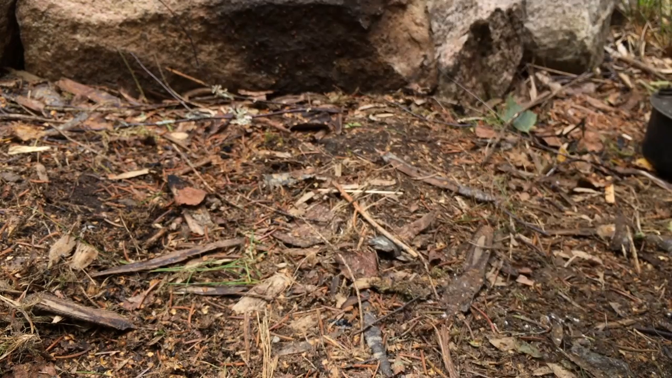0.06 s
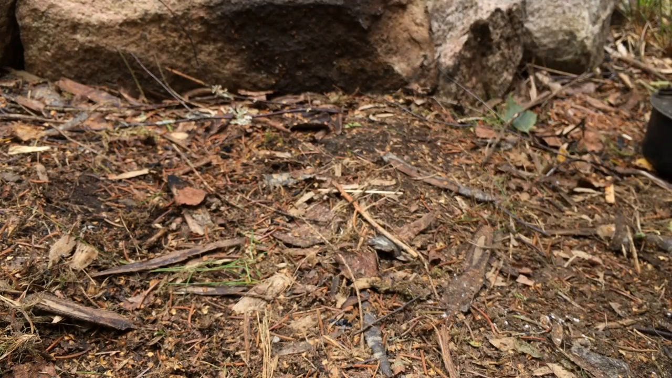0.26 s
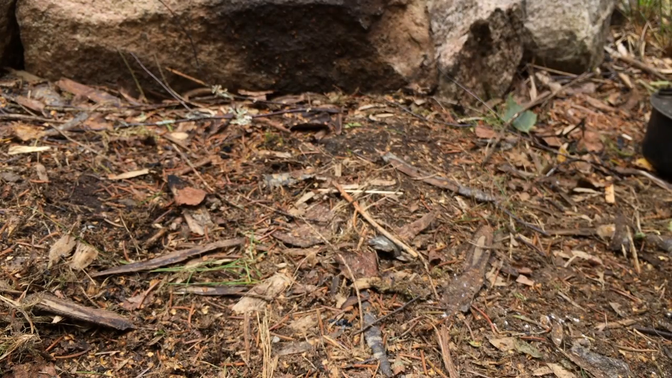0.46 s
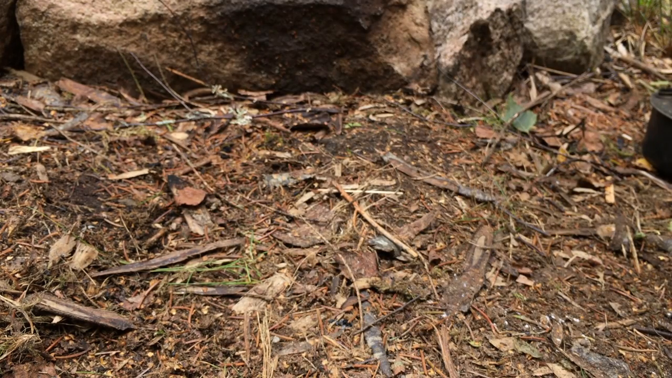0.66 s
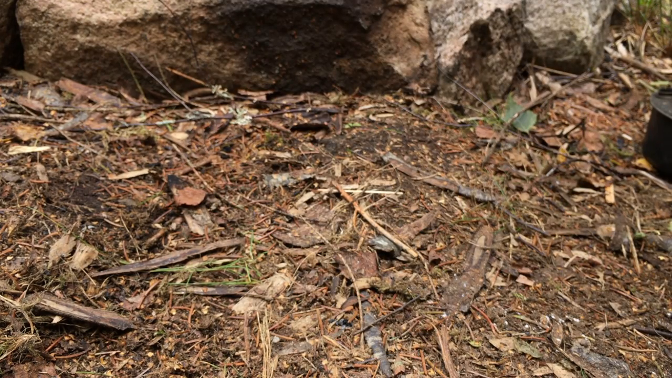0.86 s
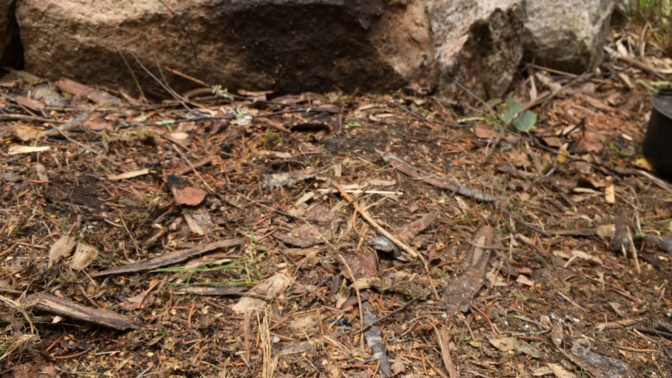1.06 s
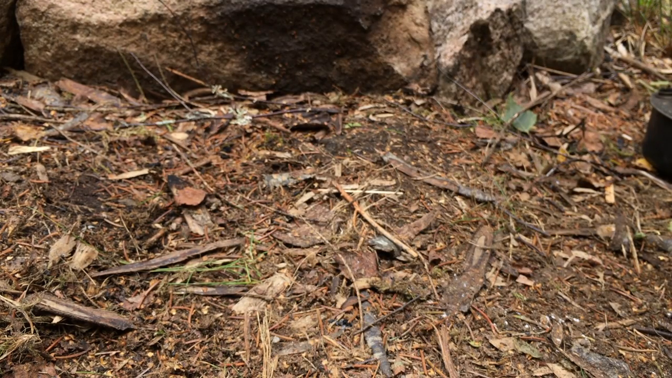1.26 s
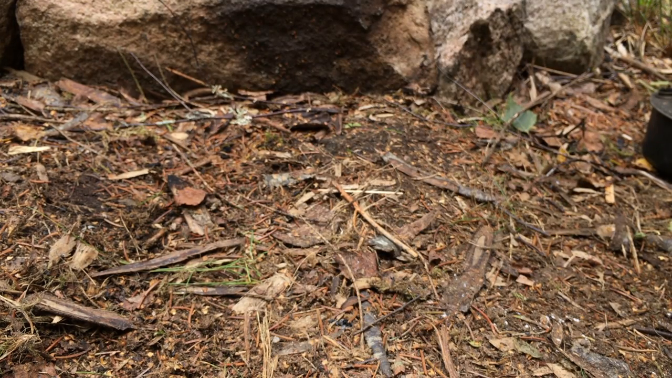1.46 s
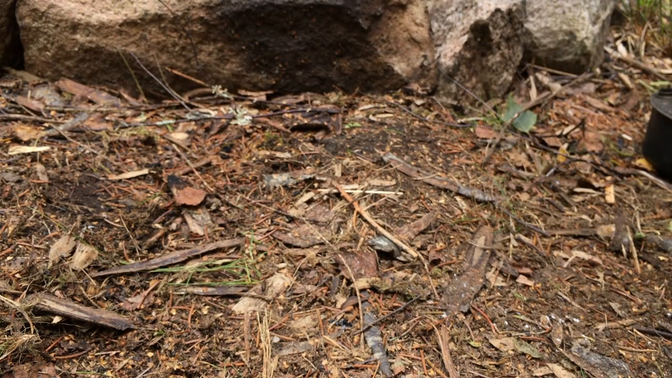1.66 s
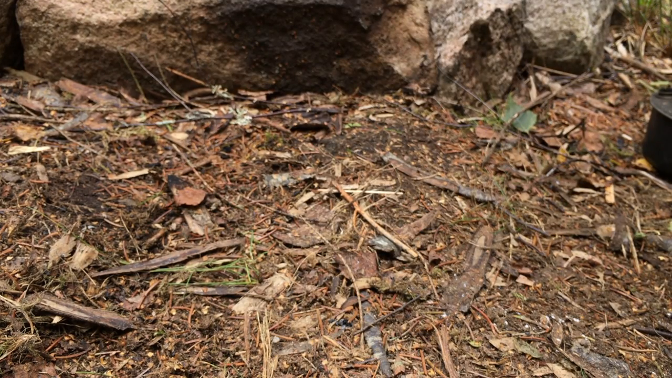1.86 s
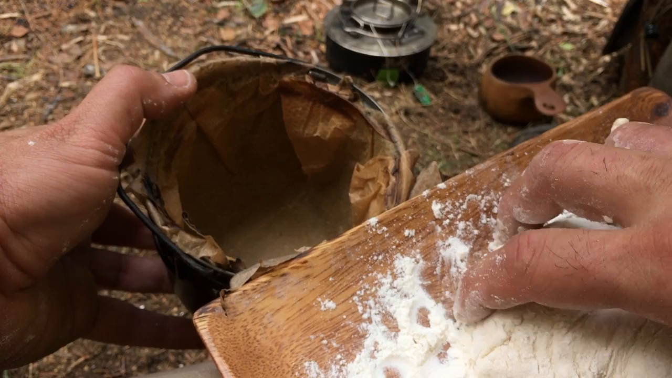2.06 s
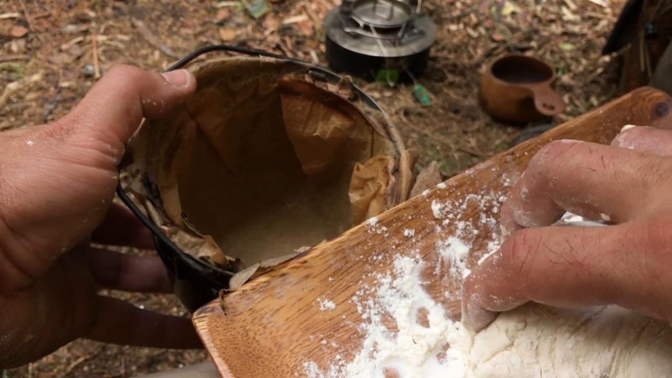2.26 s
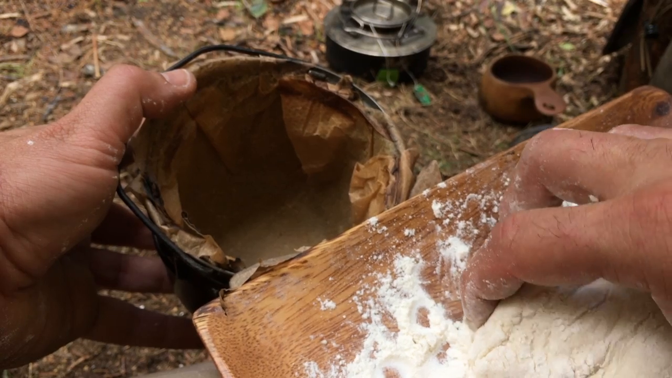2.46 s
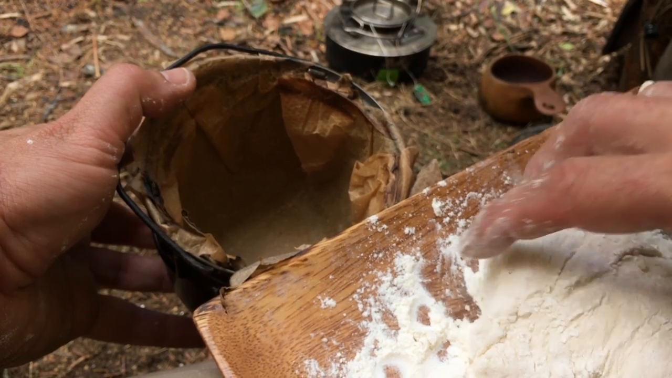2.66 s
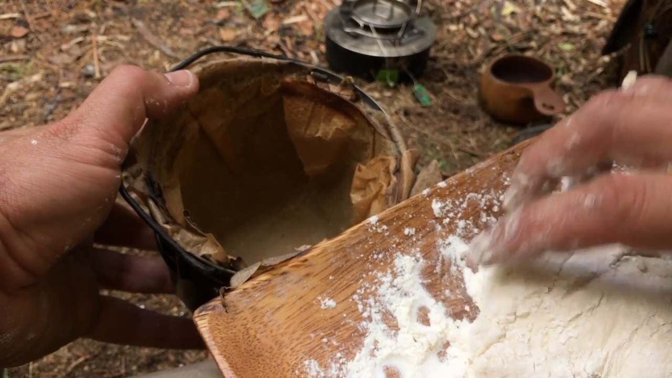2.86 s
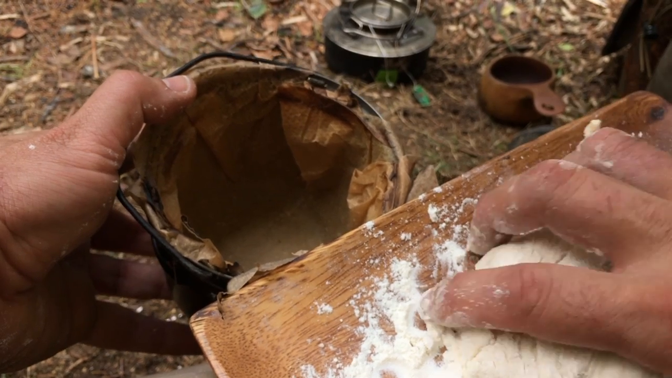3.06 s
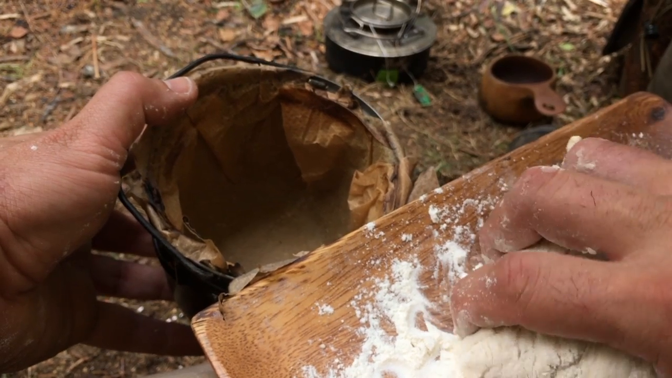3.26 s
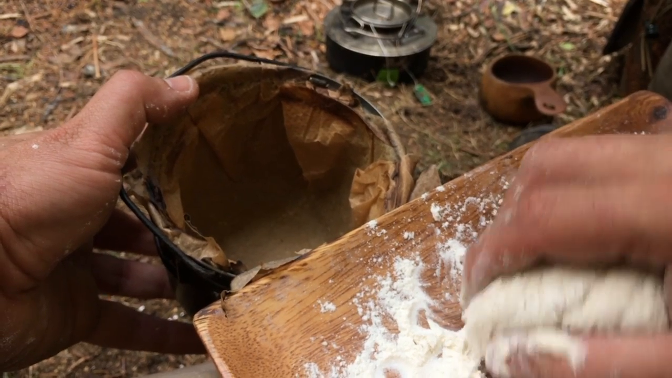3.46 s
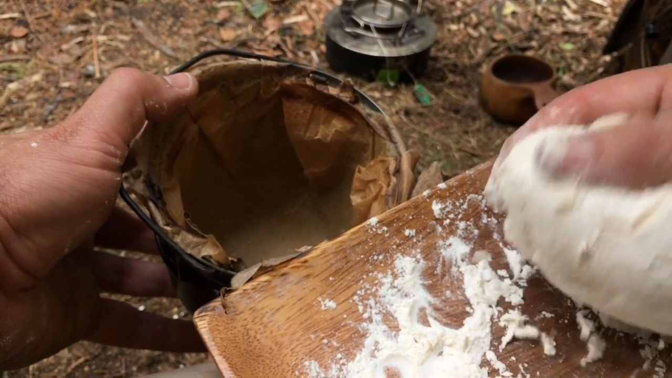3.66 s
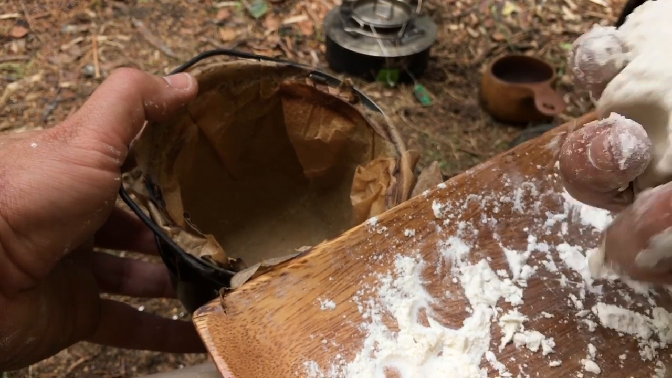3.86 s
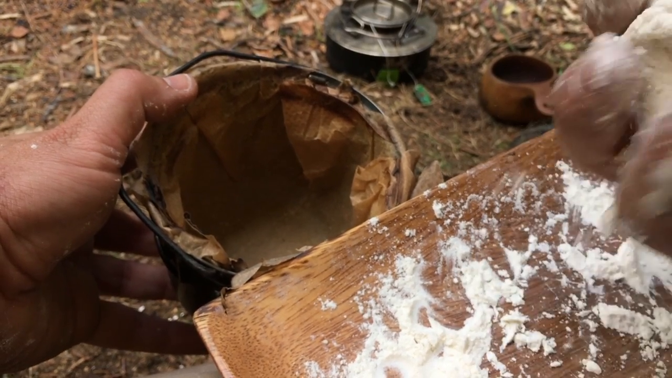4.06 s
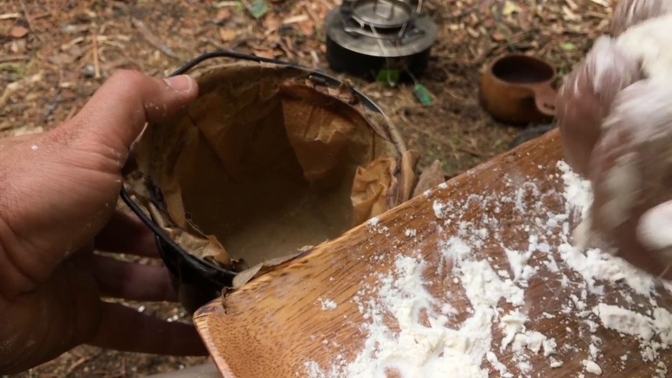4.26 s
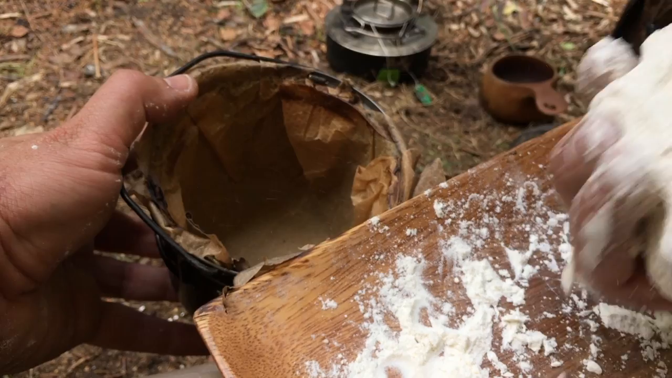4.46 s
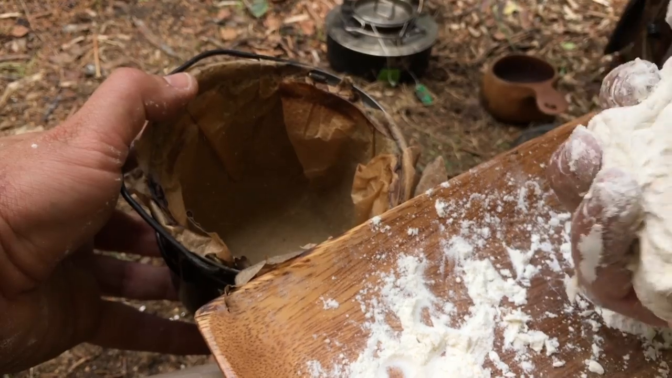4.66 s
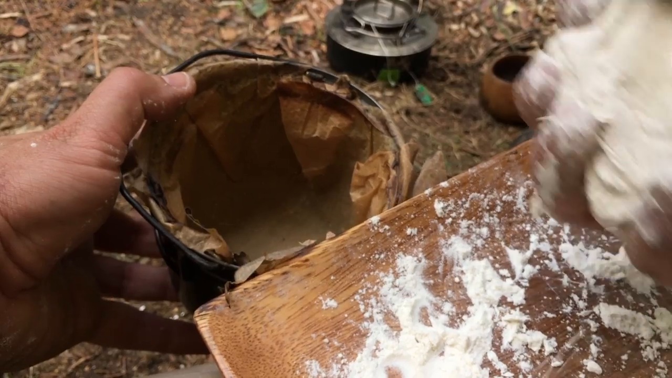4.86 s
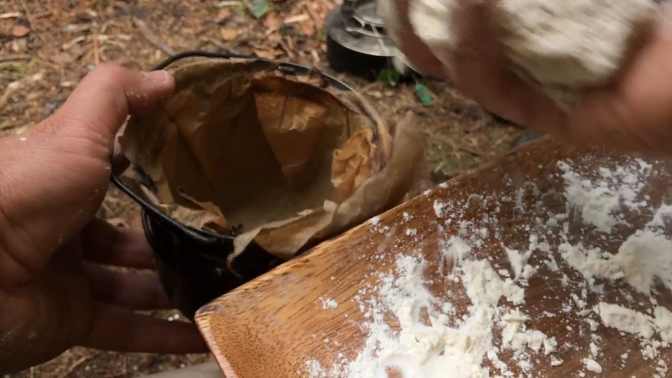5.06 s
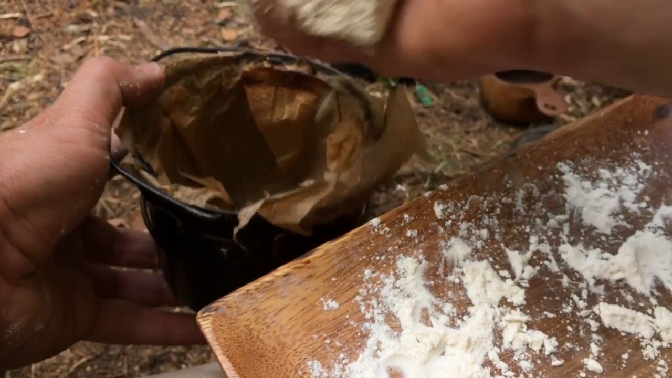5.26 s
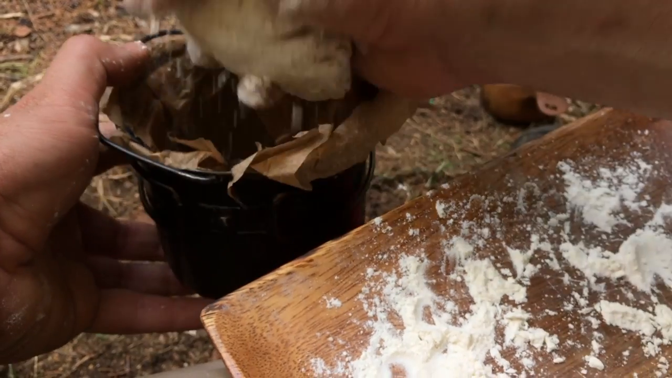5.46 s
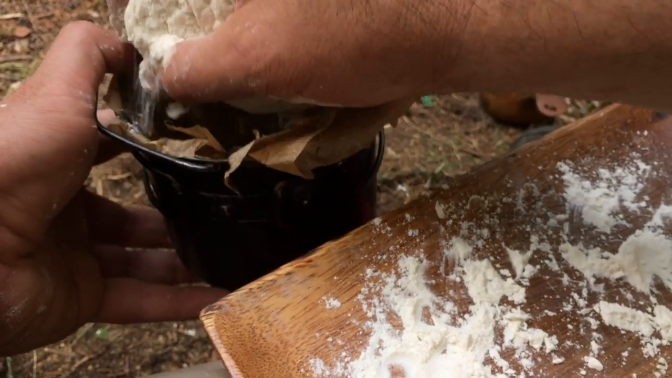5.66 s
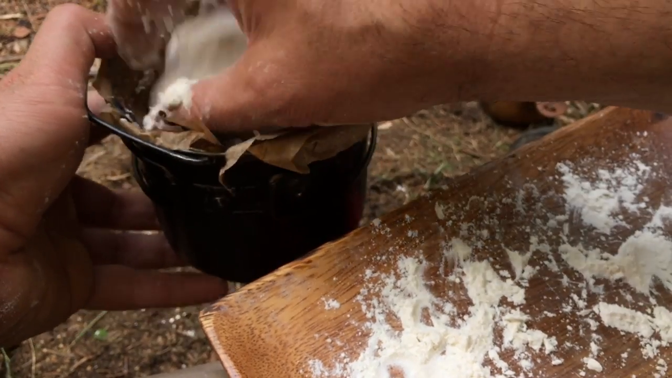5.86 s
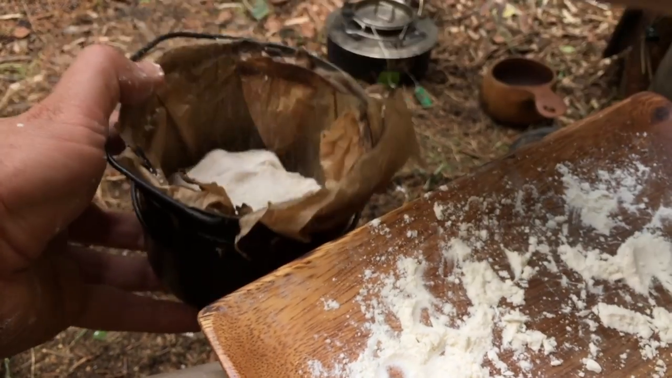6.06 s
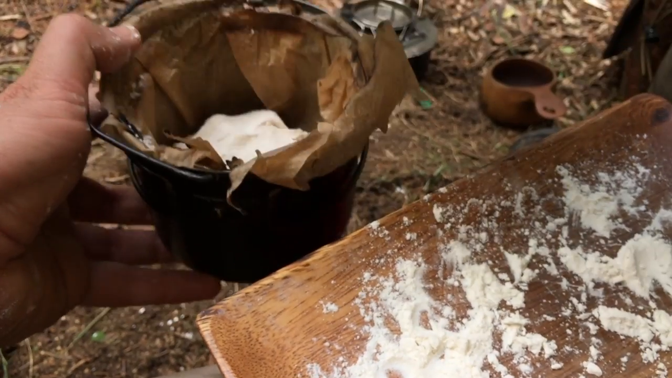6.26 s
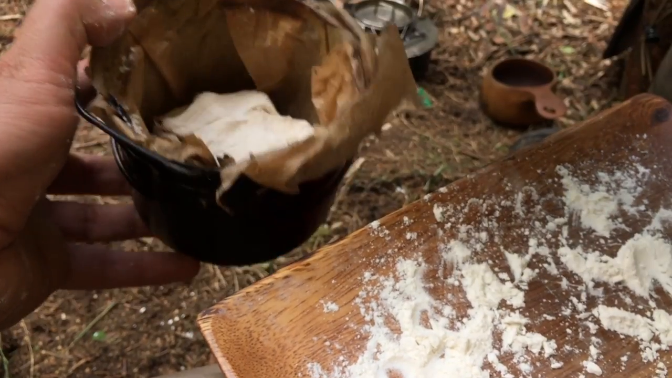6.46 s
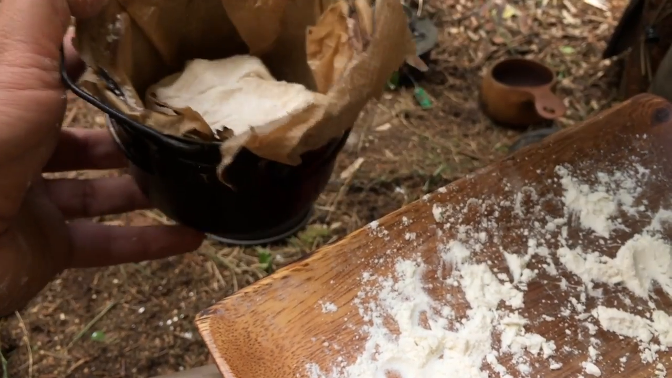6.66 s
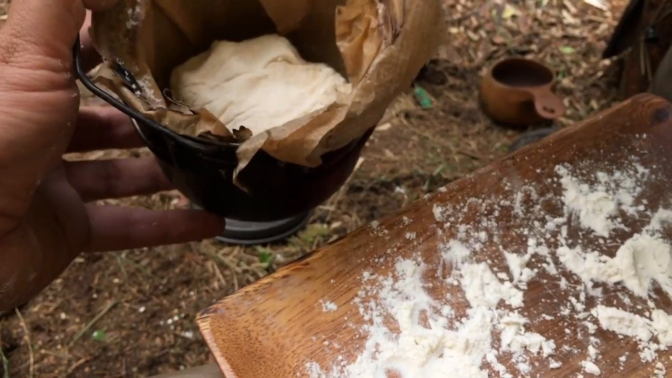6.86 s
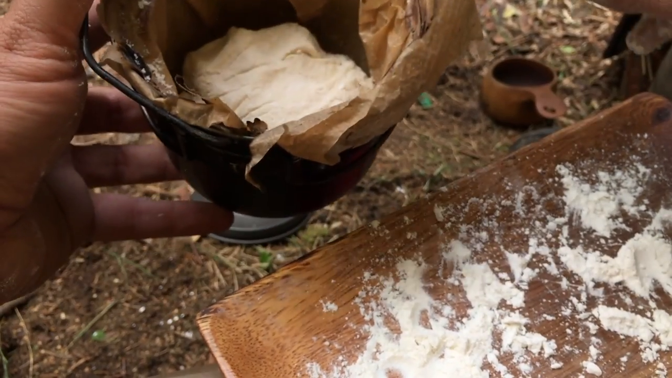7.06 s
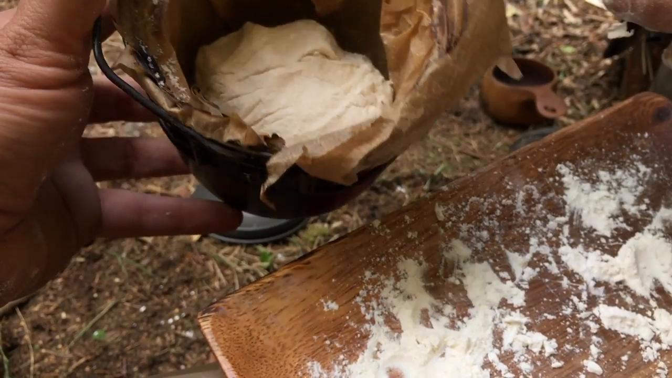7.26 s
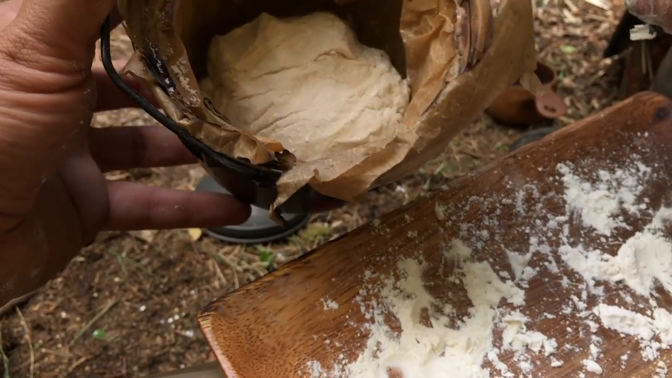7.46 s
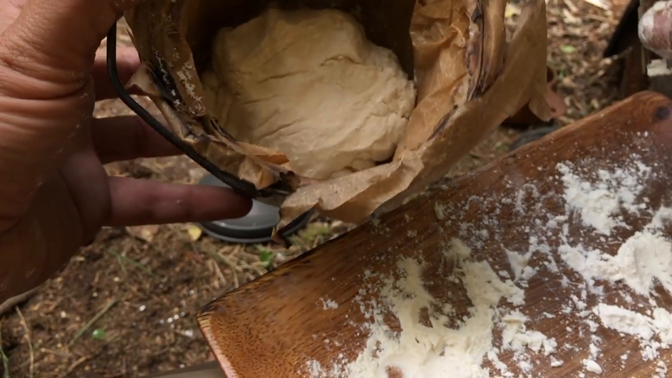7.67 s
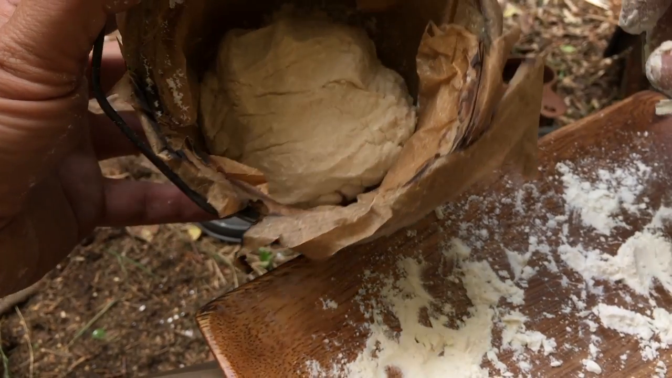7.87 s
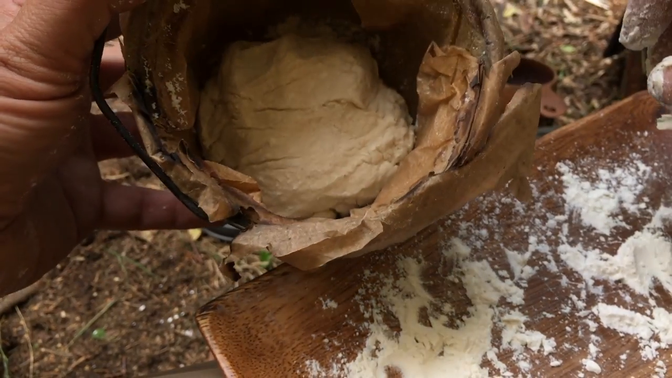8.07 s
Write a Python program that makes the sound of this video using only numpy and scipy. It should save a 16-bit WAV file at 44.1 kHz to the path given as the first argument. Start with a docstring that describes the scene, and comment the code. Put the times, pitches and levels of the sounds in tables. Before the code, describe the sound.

Hands move a small metal pot lined with baking paper, which rustles and snaps softly. The wire handle clinks against the pot early on, followed by quieter strokes of sliding paper. Then a ball of dough drops in with a loud crunch, a thud and a hollow knock. Scattered crackles and a faint rub of the pot follow. One microphone picks it up outdoors, over light wind rumble and faint hiss.

```python
"""Outdoors, over light wind rumble and a faint hiss, hands move a small metal pot lined with baking paper.
From the start the paper rustles by stick-slip friction, coloured by the pot's cavity, and creases snap.
Just after 1 s the wire handle clinks on the pot wall; more strokes of sliding paper follow. Near 6 s
a ball of dough drops in, crushing the paper with a thud and a hollow knock. Scattered snaps go on, and
near 7.7 s the pot is rubbed and hums briefly. One microphone feeds both channels."""
import sys
import numpy as np
from scipy import signal
from scipy.fft import rfft, irfft, next_fast_len
from scipy.io import wavfile
from scipy.ndimage import uniform_filter1d

SR = 44100
rng = np.random.default_rng(int(sys.argv[2]) if len(sys.argv) > 2 else 0)


def generate_wav(signal):
    """Clip the signal to [-1, 1] and save it as 16-bit WAV at the path in sys.argv[1]."""
    frames = np.transpose(np.atleast_2d(signal))
    scaled = np.clip(frames, -1, 1) * 32767
    pcm = np.round(scaled).astype(np.int16)
    wavfile.write(sys.argv[1], SR, pcm)


N = 357210

# paper sliding on dough, hand or pot:
# start t/s, rise t/s, hold t/s, fall t/s, level/dB, brightness/dB, cavity/dB, flap f/Hz, flap/dB
STROKES = [(0.397, .007, .002, 0.048, -39, -2.5, -10, 5400, -26),
           (0.434, .006, 0.048, 0.069, -42, -6, -11, 5400, -13),
           (1.147, .003, .002, 0.096, -46, -1, -23, 5000, -20),
           (1.103, 0.23, .004, 0.045, -36.5, 0, -16.5, 4950, -19),
           (1.95, 0.064, 0.085, 0.05, -45, 0, -36, 8400, -29),
           (2.171, 0.018, 0.27, 0.14, -51.5, -3, -10, 6800, -25),
           (2.539, 0.012, .002, 0.097, -43.5, -4, -12.5, 3340, -25),
           (2.883, 0.037, .03, 0.035, -44.5, -22, -11, 1330, -13),
           (2.997, 0.099, .002, .014, -51, -21, -1, 1480, -4),
           (3.122, 0.054, 0.073, 0.12, -40, -1.5, -18, 2680, -17),
           (3.463, 0.0054, .002, 0.19, -50.5, -5, -6.5, 4440, -8),
           (3.564, 0.065, .002, .022, -49, -0.5, -18, 4350, -8),
           (3.873, 0.036, .002, 0.023, -44, -0.5, -33, 4970, -16),
           (4.295, 0.021, 0.059, .011, -51, -1.5, -24, 4500, -16),
           (4.495, .008, 0.049, .012, -51.5, -1.5, -20, 6400, -7),
           (4.871, .02, 0.12, .02, -49, -2, -10.5, 5600, -15),
           (4.921, 0.12, 0.056, .016, -35.5, -1, -8.5, 2140, -8),
           (5.446, 0.026, 0.0568, 0.032, -32.5, -0.5, -18, 8850, -17),
           (5.542, 0.011, .035, 0.043, -42, -1, -15.5, 5040, -13),
           (5.634, 0.031, .002, 0.058, -40.5, -8, -6, 3700, -10),
           (5.754, 0.013, 0.082, .004, -44.5, 3, -29, 4500, -16),
           (5.84, 0.114, 0.0027, 0.0069, -19.5, -0.5, -18, 4350, -13.5),
           (5.974, .002, .002, 0.024, -20.5, 2, -15.5, 4200, -21),
           (6.788, 0.0037, 0.033, 0.0083, -44, -1.5, -17.5, 6600, -15),
           (7.175, 0.0042, .024, 0.011, -42.5, -2, -21, 5400, -13),
           (7.317, 0.0065, 0.025, .003, -43, -3, -16, 4000, -13),
           (7.442, 0.0047, 0.018, 0.0045, -46, -5, -13, 5100, -7),
           (7.543, 0.0053, .002, 0.037, -48, -5, -24, 4000, -11),
           (7.627, .009, .002, .012, -40, -1.5, -13, 4400, -11),
           (7.721, 0.0016, .002, 0.045, -41, -3.5, -14, 2020, -12),
           (7.84, 0.0018, .002, 0.036, -40, 5, -26, 2020, -17)]
def strokes():
    """Sliding friction drives the sheet and the cavity; a free flap of paper adds one broad resonance."""
    out, parts = np.zeros(N), np.array(sheet_sound())
    for start, *shape, bright_db, cavity_db, flap_hz, flap_db in STROKES:
        level = slide_envelope(start, *shape)
        fine, coarse, hollow, friction = parts[:, round(start * SR):][:, :len(level)]
        flap = gain_of(flap_db) * unit_rms(band(friction, flap_hz / 1.14, flap_hz * 1.14))
        add(out, start, level * (blend(fine, coarse, hollow, bright_db, cavity_db) + flap))
    return out

# restless handling of the paper: t/s, level/dB
HANDLING = [(0, -48.5), (.28, -50), (.55, -43), (.8, -47), (1.44, -48), (1.95, -51), (2.6, -63),
            (3.05, -52), (3.81, -56), (4.6, -58.5), (5.4, -58.5), (5.62, -55.5), (5.98, -46), (6.38, -54),
            (6.47, -59.5), (8.1, -59)]
def rustle():
    """Friction in the ever-shifting paper makes a quiet rustle; small creases buckle in stray ticks."""
    level_db = contour(HANDLING)
    cavity_db = -6.5 - 0.18 * (level_db + 55.5)  # the cavity follows the rustle's level only in part
    fine, coarse, hollow, _ = sheet_sound()
    paper = blend(fine, coarse, hollow, bright_db=-3.5, cavity_db=cavity_db)
    ticks = gain_of(-1) * random_bursts(per_s=22, spread_db=1.5, decay_s=0.00058, samples=400)
    return gain_of(level_db) * (paper + band(ticks, 5500, 19000))

# spectrum of the paper: f/Hz, spectral level/dB
PAPER_SPECTRUM = [(900, -34), (1600, 0), (3000, 2), (6000, 2.5), (10500, -7), (14000, 0.5), (16500, 4)]
# broad resonances of the sheet: f/Hz, bandwidth/Hz, level/dB
SHEET_MODES = [(2100, 480, -5), (4180, 1200, -8.5), (6850, 830, -21), (9230, 1400, 2.5), (11140, 1100, 4)]
def sheet_sound():
    """Source and filter: friction through the sheet's high and low bands, through the cavity, and bare."""
    friction, split_hz = stick_slip(), 8000
    response = lambda hz: spectrum_gain(PAPER_SPECTRUM, hz) * (1.08 + resonances(SHEET_MODES, hz))
    sheet = flexing(filtered(friction, response))
    fine = unit_rms(filtered(sheet, lambda hz: 1 / np.sqrt(1 + (split_hz / (hz + 1)) ** 6)))
    coarse = unit_rms(filtered(sheet, lambda hz: 1 / np.sqrt(1 + (hz / split_hz) ** 6)))
    return fine, coarse, cavity(friction), friction

def stick_slip(clump_db=1.17):
    """Stick-slip friction: tiny uneven slips over a smooth rub, in clumps of a few milliseconds."""
    slips = unit_rms(random_bursts(per_s=1000, spread_db=4.5, decay_s=0.00074, samples=200))
    clumps = gain_of(clump_db * slow_noise(samples=300))
    return unit_rms((slips + 1.65 * rng.standard_normal(N)) * clumps)

def flexing(x, depth_db=2.54):
    """Time-varying filter: as the sheet changes shape, random patches of its spectrum swell and fade."""
    spectra = signal.stft(x, nperseg=256, noverlap=192)[2]
    patches = uniform_filter1d(rng.standard_normal(spectra.shape), 3, axis=0)  # across frequency
    patches = unit_rms(uniform_filter1d(patches, 24, axis=1))  # across time
    flexed = signal.istft(spectra * gain_of(depth_db * patches), nperseg=256, noverlap=192)[1]
    return unit_rms(flexed[:len(x)])

def blend(fine, coarse, hollow, bright_db, cavity_db):
    """Power sharing: brightness divides the sheet's power between its bands; the cavity adds to it."""
    bright = np.clip(gain_of(bright_db), 0, .97)
    return bright * fine + np.sqrt(1 - bright ** 2) * coarse + gain_of(cavity_db) * hollow

# single creases giving way: t/s, level/dB, ring f/Hz, T60/s
CREASES = [(0.024, -36, 6500, .012), (0.107, -35.5, 7500, .01), (0.4, -31.5, 1590, 0.017),
           (.469, -28.5, 3430, .012), (.4834, -20, 4700, 0.0099), (0.569, -28, 9000, .014),
           (.606, -30.5, 6300, .014), (.639, -29.5, 6300, 0.027), (.682, -33, 3950, .018),
           (0.7038, -20.5, 6200, 0.013), (.8106, -27, 4300, .016), (.821, -34, 7300, .014),
           (.861, -33.5, 6500, .014), (0.9418, -32, 7460, 0.023), (1.0937, -34, 6780, .009),
           (1.292, -26.5, 12900, .011), (1.3806, -35, 9410, .011), (1.4522, -24, 2660, 0.016),
           (1.461, -28, 6070, 0.017), (2.552, -32, 8460, 0.02), (2.822, -34, 8700, .011),
           (2.9498, -30, 1390, 0.014), (3.6541, -40, 13000, .013), (3.9669, -39.5, 9840, .01),
           (4.221, -39.5, 14800, .018), (4.4062, -32.5, 13700, 0.022), (4.88, -38, 5270, .011),
           (4.91, -35, 9600, .014), (5.0461, -24.5, 2150, 0.016), (5.0735, -33, 2270, .008),
           (5.199, -42, 8960, .012), (5.2162, -37, 6600, 0.018), (5.4195, -42, 1840, 0.034),
           (5.466, -33, 5000, .012), (5.7762, -27.5, 11100, 0.031), (5.883, -24, 4500, .014),
           (6.0008, -22.5, 4410, 0.019), (6.0534, -35, 7530, .014), (6.133, -30, 5700, .025),
           (6.1649, -35, 4500, .007), (6.1804, -33, 6380, .011), (6.188, -35, 5730, .014),
           (6.3004, -34, 4260, 0.0087), (6.3414, -29.5, 1820, .017), (6.3822, -29, 7600, 0.017),
           (6.627, -38, 12700, .018), (6.759, -41, 4240, .029), (6.8108, -29, 5940, .009),
           (6.8523, -41, 13700, .01), (6.9784, -29.5, 1640, 0.0093), (7.2103, -32, 4550, .01),
           (7.348, -17.5, 8770, 0.013), (7.401, -31.5, 5340, 0.0086), (7.4694, -13.5, 11600, 0.0058),
           (7.4984, -34, 6430, 0.009), (7.5365, -34, 9000, 0.0073), (7.5743, -35.5, 8900, .008),
           (7.6348, -28, 5900, 0.01), (7.8377, -26.5, 11400, 0.01), (7.9114, -31, 6440, .008),
           (7.992, -34, 13500, 0.011), (8.0596, -43, 13700, .012)]
def snaps():
    """Buckling: each crease releases a short broadband burst with a narrow ring inside."""
    out, t = np.zeros(N), np.arange(3000) / SR
    for start, db, hz, t60 in CREASES:
        noise = rng.standard_normal((3, len(t)))
        low_hz = hz * np.clip(-.25 - db / 45, .15, .8)  # faint creases lack the lows
        burst = unit_rms(band(noise[0], low_hz, hz * 4.4))
        ring = 1.21 * unit_rms(band(noise[1], hz / 1.057, hz * 1.046))
        treble = 0.29 * unit_rms(band(noise[2], 6500, .49 * SR))
        attack = np.minimum(t / 0.00019, 1)
        fade = decay(t, max(t60, .003)) + 0.31 * np.exp(-t / 0.00016)
        add(out, start, gain_of(db) * attack * fade * unit_rms(burst + ring + treble))
    return out

# the dough lands: t/s, crush level/dB, thud level/dB
LANDINGS = [(5.9602, -11, -25)]
def dough_landing(peak_s=.0062):
    """Inelastic impact: the dough flattens the paper and pushes the pot down with a thud."""
    out, t = np.zeros(N), np.arange(6000) / SR
    noise = rng.standard_normal((2, len(t)))
    crush = unit_rms(band(noise[0], 3200, 6200)) + unit_rms(band(noise[1], 2060, 17000))
    rise = 0.25 + 0.79 * np.exp(-.5 * ((t - peak_s) / 0.0016) ** 2)
    swell = np.where(t < peak_s, rise, np.exp(-(t - peak_s) / 0.0041))
    thud = np.sin(2 * np.pi * 42 * t) * decay(t, 0.21)
    thud += 1.54 * np.sin(2 * np.pi * 230 * t) * decay(t, 0.02)
    for start, crush_db, thud_db in LANDINGS:
        add(out, start, gain_of(crush_db) * crush * swell)
        add(out, start + 0.002, gain_of(thud_db) * thud)
    return out

# modes of the pot wall: f/Hz, level at spot 0/dB, level at spot 1/dB, T60/s
WALL_MODES = [(2740, -11, -11.5, 0.029), (4150, 3.5, -12, 0.025), (4550, -2.5, -17, 0.029),
              (4900, -17, -5.5, 0.067), (5630, -6.5, -14, 0.063), (6670, -16, -19, 0.094),
              (7110, -20, 2.5, 0.042), (8100, -16, -18, .043), (8800, -7.5, -23, .08), (9400, -24, -9, .05),
              (10100, -8, -24, 0.059), (11160, -12, -2, 0.034), (11800, -4, -12, 0.042),
              (12490, -3, -8, .04), (13610, -3, 0, 0.039), (14500, -8, -12, .035), (15290, -5, -8, 0.039)]
# the handle strikes the pot: t/s, level/dB, spot struck (0 to 1)
HANDLE_STRIKES = [(1.038, -23, 0.05), (1.065, -36, 0.66), (1.131, -23.5, 1), (1.139, -29.5, 0.1)]
def clinks():
    """Modal vibration: the spot struck weights the wall's modes; the contact adds a short scratch."""
    out, t = np.zeros(N), np.arange(8000) / SR
    hz, spot0_db, spot1_db, t60 = np.transpose(WALL_MODES)[:, :, None]
    phases = rng.random((len(HANDLE_STRIKES), len(WALL_MODES), 1))
    attack = np.minimum(t / 0.00064, 1)
    for (start, db, spot), phase in zip(HANDLE_STRIKES, phases):
        weights = gain_of((1 - spot) * spot0_db + spot * spot1_db)
        modes = weights * decay(t, t60) * np.sin(2 * np.pi * (hz * t + phase))
        scratch = 0.66 * band(rng.standard_normal(len(t)), 3000, 18000) * decay(t, 0.031)
        add(out, start, gain_of(db) * attack * (modes.sum(0) + scratch))
    return out

# knocks on the pot: t/s, level/dB
KNOCKS = [(5.962, -10), (6.979, -34)]
def knocks():
    """Impulse response: a knock sets off a brief note in the cavity, with a weaker one above."""
    out, t = np.zeros(N), np.arange(3000) / SR
    note = np.sin(2 * np.pi * 740 * t) + 0.43 * np.sin(2 * np.pi * 1450 * t)
    attack = np.minimum(t / 0.0014, 1)
    for start, db in KNOCKS:
        add(out, start, gain_of(db) * attack * decay(t, 0.022) * note)
    return out

# resonances of the air in the pot: f/Hz, bandwidth/Hz, level/dB
CAVITY_MODES = [(608, 95, 5.5), (840, 940, 2), (1112, 69, 4.5), (1350, 360, 1.5)]
def cavity(friction):
    """Cavity resonance: the air in the pot reinforces the friction noise near its natural frequencies."""
    passband = lambda hz: 1 / (1 + (480 / (hz + 1)) ** 6) / (1 + (hz / 1500) ** 6)
    return unit_rms(filtered(friction, lambda hz: resonances(CAVITY_MODES, hz) * passband(hz)))

# the pot is rubbed along something: start t/s, rise t/s, hold t/s, fall t/s, level/dB
RUBS = [(7.711, 0.048, 0.075, 0.22, -50.5)]
def pot_rub():
    """Forced vibration: smooth friction makes the cavity hum."""
    out = np.zeros(N)
    modes = [(1086, 71, 2), (920, 120, -4), (730, 130, -7), (517, 250, -5.5)]  # hum resonances of the rubbed pot, set apart from CAVITY_MODES: f/Hz, bandwidth/Hz, level/dB
    for start, *shape in RUBS:
        level = slide_envelope(start, *shape)
        hum = filtered(rng.standard_normal(len(level)), lambda hz: resonances(modes, hz) ** 2)
        add(out, start, level * unit_rms(hum))
    return out

# spectrum of the outdoor air: f/Hz, spectral level/dB
AIR_SPECTRUM = [(12, -21), (20, 1.5), (65, 1.5), (151, -6), (218, -14), (297, -10), (452, -18.5),
                (772, -31.5), (1050, -29.5), (1690, -30), (6170, -38.5), (10200, -40.5), (15200, -48),
                (16500, -31)]
# wind rumble: t/s, level/dB
GUSTS = [(0, -43.5), (.88, -45), (1.8, -45), (3.7, -46.5), (4.2, -46.5), (5.8, -49), (6.5, -47),
         (7.45, -50.5), (7.75, -44), (8.1, -48)]
def wind(split_hz=420):
    """Amplitude modulation: gusts swell a lumpy low rumble beneath a steady hiss."""
    noise = filtered(rng.standard_normal(N), lambda hz: spectrum_gain(AIR_SPECTRUM, hz))
    air = gain_of(-48) * unit_rms(noise)
    rumble = filtered(air, lambda hz: 1 / (1 + (hz / split_hz) ** 4))
    hiss = air - rumble
    gust_db = contour(GUSTS) + 2.2 * slow_noise(samples=2000)
    return hiss + gain_of(gust_db) * unit_rms(rumble)

def slide_envelope(start, rise, hold, fall, db, edge_db=-20.5):
    """Envelope linear in decibels: rise, hold and fall, with soft ends."""
    corners = start + np.cumsum([0, rise, hold, fall])
    t = np.arange(start, corners[-1], 1 / SR)
    ends = np.clip(np.minimum(t - t[0], t[-1] - t) / .0015, 0, 1)
    return gain_of(db + np.interp(t, corners, [edge_db, 0, 0, edge_db])) * ends

def random_bursts(per_s, spread_db, decay_s, samples):
    """Poisson process: decaying noise bursts of uneven size."""
    sizes = gain_of(spread_db * np.minimum(rng.exponential(1, N), 4))
    onsets = rng.random(N) < per_s / SR
    grain = np.exp(-np.arange(samples) / (decay_s * SR))
    return signal.oaconvolve(sizes * onsets, grain)[:N] * rng.standard_normal(N)

def slow_noise(samples):
    """Two moving averages turn noise into a slow fluctuation."""
    return unit_rms(uniform_filter1d(uniform_filter1d(rng.standard_normal(N), samples), samples))

def resonances(modes, hz):
    """Summed magnitude responses of damped resonators."""
    return sum(gain_of(db) / np.sqrt(1 + (2 * (hz - f) / width) ** 2) for f, width, db in modes)

def spectrum_gain(points, hz):
    """Gain interpolated in decibels over log frequency."""
    f, db = np.transpose(points)
    return gain_of(np.interp(np.log(hz + 1), np.log(f + 1), db))

def contour(points):
    """Linear interpolation of levels over time."""
    return np.interp(np.arange(N) / SR, *np.transpose(points))

def filtered(x, response):
    """Zero-phase filter with a magnitude given as a function of frequency."""
    size = next_fast_len(len(x))
    return irfft(rfft(x, size) * response(np.fft.rfftfreq(size, 1 / SR)), size)[:len(x)]

def band(x, lo_hz, hi_hz):
    """Causal band-pass."""
    edges = [lo_hz, min(hi_hz, .49 * SR)]
    return signal.sosfilt(signal.butter(2, edges, "bandpass", fs=SR, output="sos"), x)

def decay(t, t60):
    """Exponential damping: 60 dB down after t60 seconds."""
    return gain_of(-60 * t / t60)

def gain_of(db):
    """Decibels to an amplitude ratio."""
    return 10 ** (np.asarray(db) / 20)

def unit_rms(x):
    """Normalisation to rms 1."""
    return x / np.sqrt(np.mean(x ** 2) + 1e-20)

def add(mix, start, sound):
    """Superposes a sound from a start time in seconds."""
    part = mix[round(start * SR):][:len(sound)]
    part += sound[:len(part)]

def scene():
    """Superposition: paper, pot and wind sum at one microphone."""
    paper = rustle() + strokes() + snaps() + dough_landing()
    pot = clinks() + knocks() + pot_rub()
    return np.tile(paper + pot + wind(), (2, 1))

# dips of the microphone housing: f/Hz, width/Hz, level/dB
HOUSING_DIPS = [(4870, 220, -4.5), (7760, 650, -1), (10500, 480, -2.5)]
def record(dry):
    """Frequency response: shallow dips from the housing, then a low-pass band limit."""
    def housing(hz):
        return gain_of(sum(db * np.exp(-2 * ((hz - f) / width) ** 2) for f, width, db in HOUSING_DIPS))
    heard = np.array([filtered(channel, housing) for channel in dry])
    low_pass = signal.firwin(1023, cutoff=15900, window=("kaiser", 9), fs=SR)
    return signal.oaconvolve(heard, low_pass[None], "same")

dry = scene()
out = record(dry)
generate_wav(out)
```